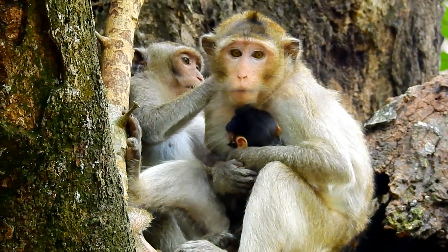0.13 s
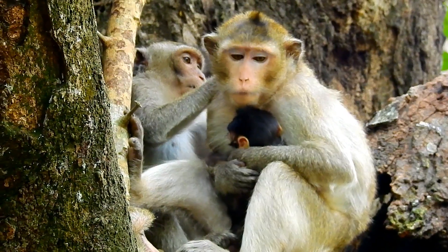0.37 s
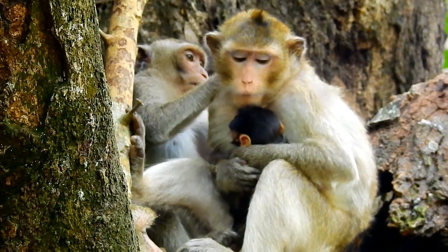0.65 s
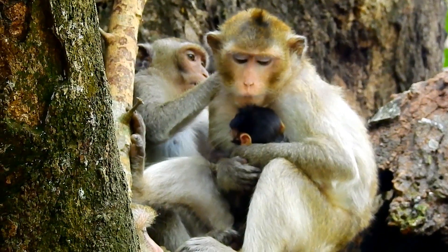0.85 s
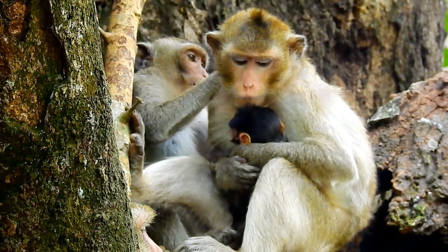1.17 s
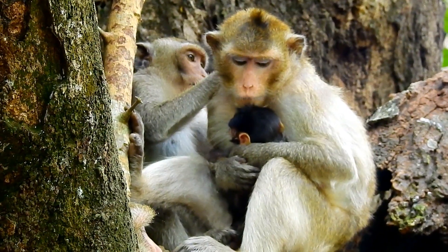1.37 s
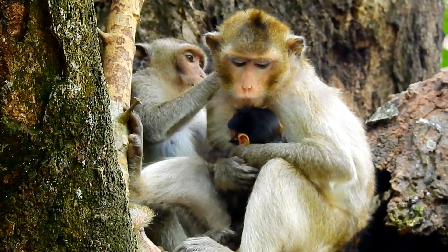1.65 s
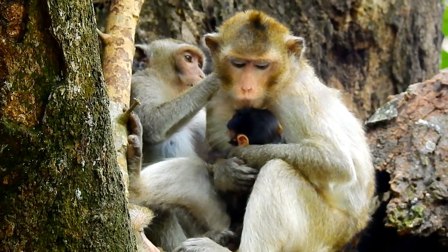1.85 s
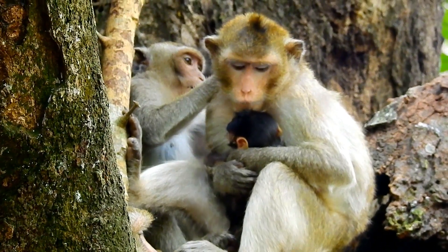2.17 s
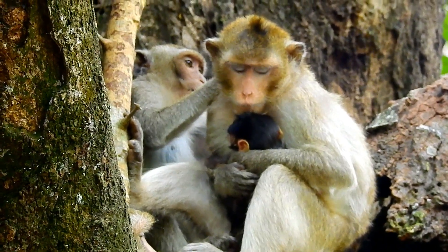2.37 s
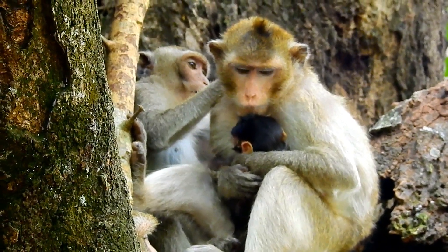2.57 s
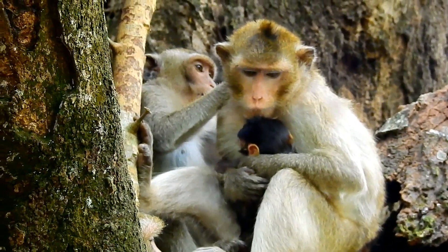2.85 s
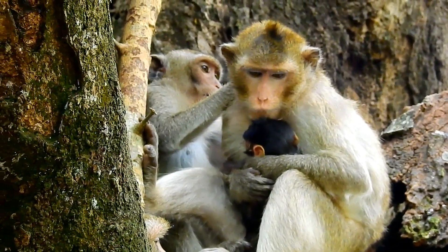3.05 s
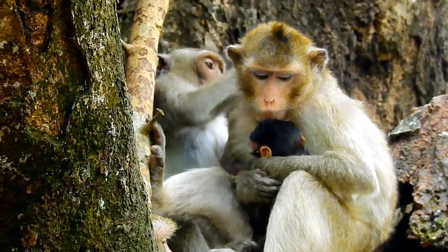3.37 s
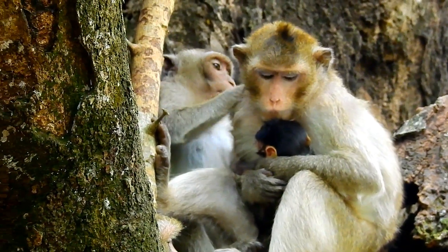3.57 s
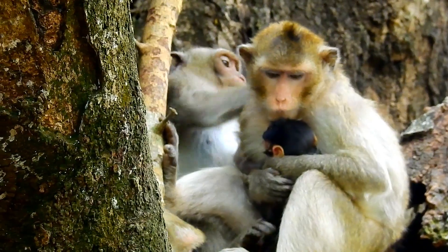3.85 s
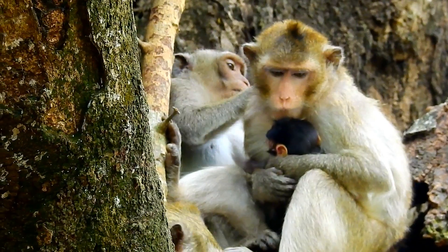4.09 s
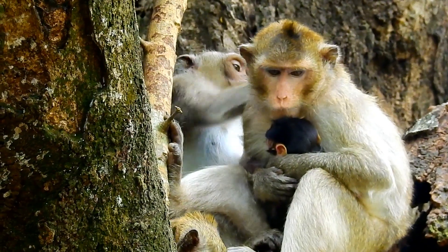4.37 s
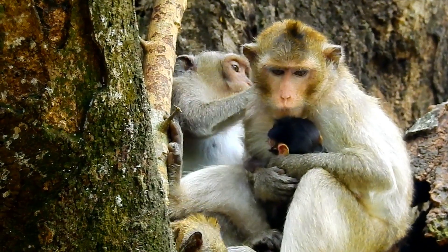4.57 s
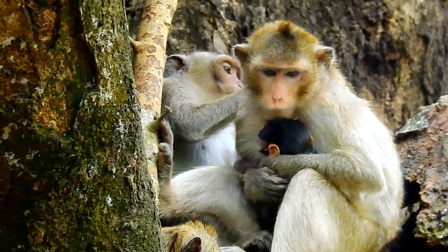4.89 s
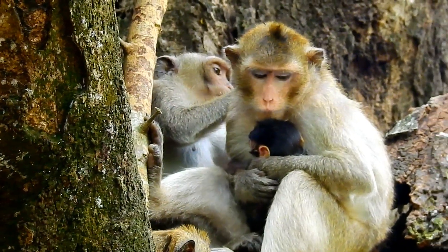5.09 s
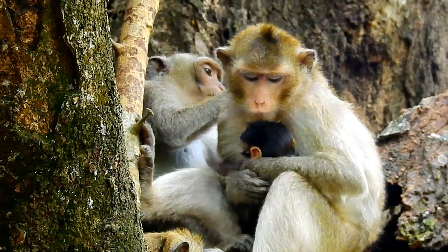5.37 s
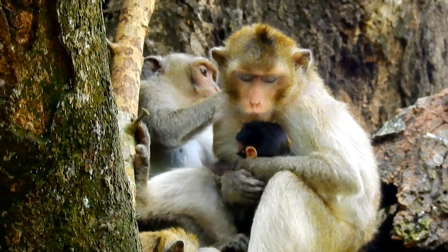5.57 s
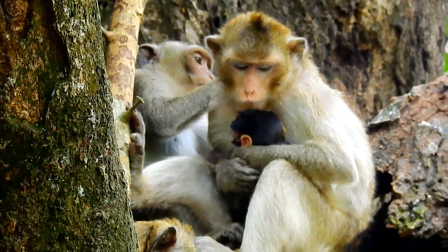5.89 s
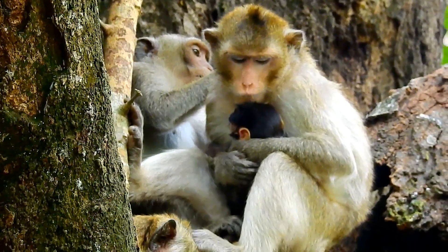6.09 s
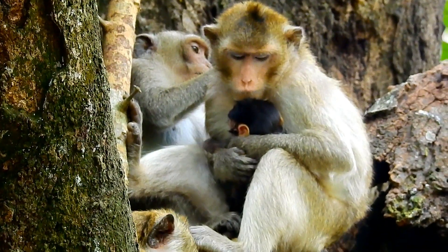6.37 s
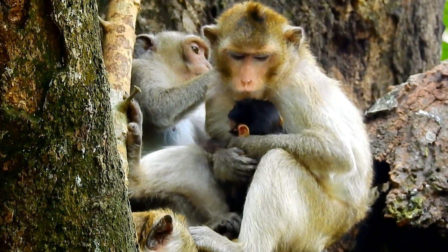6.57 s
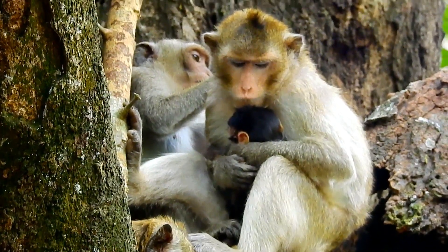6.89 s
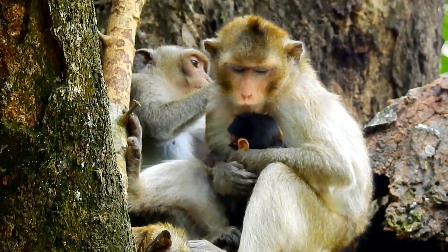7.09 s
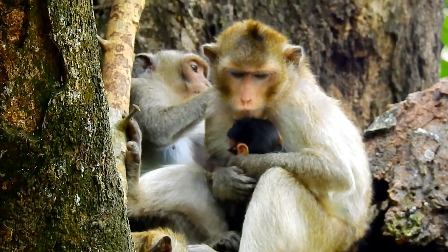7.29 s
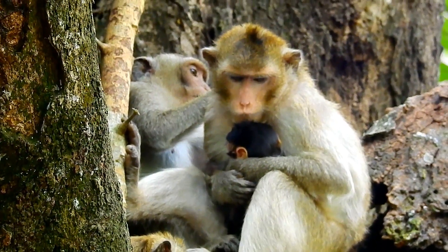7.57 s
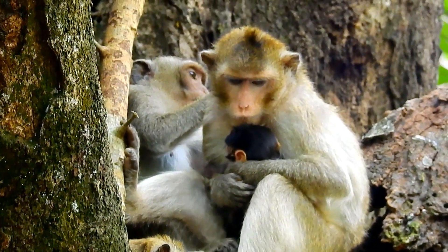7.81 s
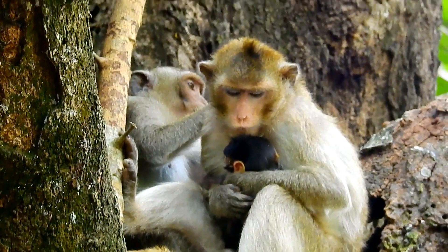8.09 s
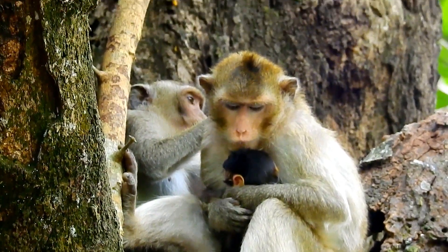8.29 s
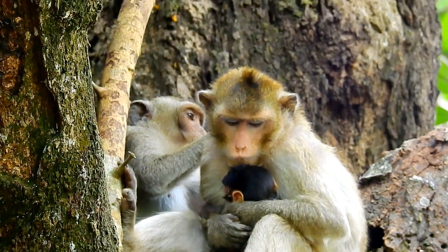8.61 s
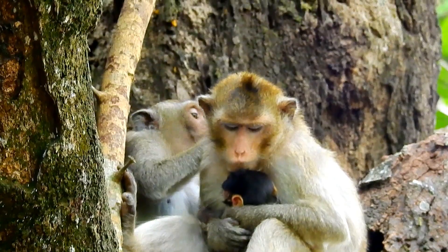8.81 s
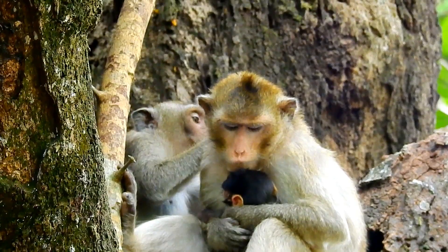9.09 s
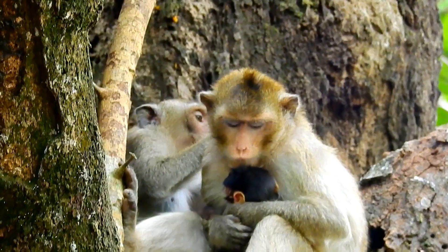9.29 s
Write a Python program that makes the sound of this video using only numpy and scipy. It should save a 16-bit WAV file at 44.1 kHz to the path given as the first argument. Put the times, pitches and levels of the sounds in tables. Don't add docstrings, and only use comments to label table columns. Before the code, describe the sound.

Outdoor forest with a constant high cicada hiss and soft distant traffic rumble. A faint falling whistle-like animal call comes early, then two tiny dull taps. Midway, a monkey close to the microphone scrambles for about a second, thrashing dry leaves and thudding on branches. Smaller rustles follow, then scattered woody ticks, and the insects remain.

```python
import sys
import numpy as np
from scipy import signal
from scipy.fft import rfft, irfft, next_fast_len
from scipy.io import wavfile
from scipy.ndimage import uniform_filter1d, map_coordinates

SR = 44100
rng = np.random.default_rng(int(sys.argv[2]) if len(sys.argv) > 2 else 0)


def volts_from_db(level):
    exponent = np.asarray(level, float) / 20
    return 10 ** exponent


def materialize(psi):
    bounded = np.clip(np.atleast_2d(psi).T, -1, 1)
    quanta = np.round(bounded * 32767).astype(np.int16)
    wavfile.write(sys.argv[1], SR, quanta)


N = 416744


def unit(x):
    return x / np.sqrt(np.mean(x ** 2) + 1e-20)


def along(points, hz):
    f, v = np.transpose(points)
    return np.interp(np.log(hz + 1), np.log(f + 1), v)


def curves(rows):
    s, *columns = np.transpose(rows)
    return [np.interp(np.arange(N) / SR, s, column) for column in columns]


def wobble(rate):
    knots = rng.standard_normal(int(N * rate / SR) + 4)
    return map_coordinates(knots, [np.arange(N) * rate / SR])


def filtered(x, response):
    m = next_fast_len(N + SR // 2)
    return irfft(rfft(x, m) * response(np.fft.rfftfreq(m, 1 / SR)), m)[..., :N]


def modes(table):
    def resonance(f, centre, width, db):
        return volts_from_db(db) * 1j * f * width / (centre * centre - f * f + 1j * f * width)

    return lambda f: sum((-1) ** k * resonance(f, *row) for k, row in enumerate(table))


def shaped(x, table):
    return unit(filtered(x, lambda hz: volts_from_db(along(table, hz))))


def patchy(depth_db):
    z = signal.stft(rng.standard_normal((2, N)), nperseg=256)[2]
    field = rng.standard_normal(z.shape[1:])
    field = uniform_filter1d(uniform_filter1d(field, 8, 0), 8, 1)
    return unit(signal.istft(z * volts_from_db(depth_db * unit(field)), nperseg=256)[1][:, :N])


def bursts(events, rise):
    t, env = np.arange(SR // 2) / SR, np.zeros(N + SR)
    for s, db, t60 in events:
        env[round(s * SR):][:len(t)] += volts_from_db(db - 60 * t / t60) * (1 - np.exp(-t / rise))
    return env[:N]


# frequency in Hz, left-right likeness 0-1.
NEAR_WIDTH = [(60, 1), (600, 0.9402), (2000, 0.9133), (4100, 0.8551), (6900, 0.7305), (10000, 0.1335),
              (15000, 0.317)]
FAR_WIDTH = [(60, 1), (200, 0.9474), (600, 0.7823), (2000, 0.9813), (4100, 0.4766), (6900, 0.4516),
             (10000, 0.3467), (15000, 0.22)]
# frequency in Hz, lead of the left port in radians.
PORT_LEAD = [(100, 0), (300, -0.2418), (3400, 0.2585), (5500, 0.7711), (6900, 1.5), (8300, 2), (12000, 3.5)]


def spread(pair, alike):
    def mid_side(hz):
        angle = np.arccos(np.clip(along(alike, hz), -1, 1)) / 2
        return np.array([np.cos(angle), np.sin(angle)])

    mid, side = filtered(pair, mid_side)
    return filtered(np.array([mid + side, mid - side]),
                    lambda hz: np.exp(.5j * along(PORT_LEAD, hz) * [[1], [-1]]))


# time in seconds, turn 0-1, low swell in dB.
CHORUS_TURNS = [(0.0, 0.17, -1), (0.8, 0.3, 0), (1.4, 0.25, 0), (3.2, 0.12, -1), (4.4, 0.84, 1),
                (5.4, 0.27, 3), (5.9, .3, 0), (6.4, .8, -.5), (6.9, .95, -.5), (7.2, .6, 1.5),
                (7.6, .3, -1), (9.45, 0.14, -1)]
# band in Hz, width in Hz, level in dB (all but the first ride on their crowd's level).
TYMBALS = [(5135.1, 793.6, -38.5), (6136.2, 690.7, 3), (6757, 620.5, 1.5), (7193.7, 864, 5),
           (8304, 606.8, -7.5)]
LOW_DB, MIDDLE_DB, HIGH_DB = -37, -44, -34
TURN_SWELL_DB, TURN_HUSH_DB = 14, 4.5
PULSE_HZ = (109.02, 238.95, 196.64, 92.96, 298.6)


def cicadas():
    turn, low_swell_db = curves(CHORUS_TURNS)
    low_db = LOW_DB + low_swell_db
    middle_db = MIDDLE_DB + TURN_SWELL_DB * turn
    high_db = HIGH_DB - TURN_HUSH_DB * turn
    crowds_db = [0, low_db, middle_db, high_db, high_db]
    out = 0
    for (hz, width, db), crowd_db, rate in zip(TYMBALS, crowds_db, PULSE_HZ):
        drifting_hz = rate * (1 + 0.087 * wobble(3.4))
        beat = 1 + 0.0835 * np.cos(2 * np.pi * np.cumsum(drifting_hz) / SR)
        band = lambda f: modes([(hz, width, 0)])(f) ** 2 / (1 + (f / 10000) ** 8)
        level = volts_from_db(db + crowd_db + 0.829 * wobble(1) + 0.473 * wobble(9))
        out = out + level * unit(filtered(beat * patchy(depth_db=0.5), band))
    return spread(out, FAR_WIDTH)


# frequency in Hz, level in dB per Hz.
TRAFFIC_COLOUR = [(13, -41.5), (22, -20.5), (32, -12.5), (54, -4.5), (75, 1.5), (167, -6.5), (193, -12.5),
                  (320, -33), (420, -34.5), (700, -120)]
# frequency in Hz, level in dB per Hz.
AIR_COLOUR = [(120, -12.5), (200, -1), (260, -5), (400, -2.5), (700, -1.5), (2260, -8), (3500, 1),
              (4300, -4.5), (9000, -4.5), (10300, -16), (11200, -9.5), (12200, -32.5), (13500, -38),
              (14600, -17), (15300, -32)]
TRAFFIC_DB, AIR_DB = -40.5, -47


def distance():
    rumble = shaped(patchy(depth_db=.5), TRAFFIC_COLOUR)
    wash = shaped(patchy(depth_db=2.5), AIR_COLOUR)
    heave = volts_from_db(TRAFFIC_DB + 1.141 * wobble(2.5356))
    return spread(heave * rumble + volts_from_db(AIR_DB) * wash, FAR_WIDTH)


# time in seconds, level in dB.
WHINE_LEVEL = [
    (0, -75.5),
    (2.0, -65.5),
    (2.2, -60.5),
    (3.3, -61),
    (4, -78.5),
    (7.2, -62.5),
    (9.45, -62),
]


def whine():
    line = unit(filtered(rng.standard_normal((2, N)), lambda f: modes([(1770, 150, 0)])(f) ** 2))
    return volts_from_db(curves(WHINE_LEVEL)[0]) * spread(line, FAR_WIDTH)


# time in seconds, swish in dB.
RESTLESSNESS = [(0.0, -40), (0.29, -50), (0.53, -43), (1.45, -48.5), (1.74, -56.5), (2.8, -57.5),
                (3.36, -51), (3.48, -36.5), (4.45, -38.5), (4.72, -41.5), (5.2, -47.5), (5.64, -53.5),
                (5.75, -45), (6.9, -46), (7.27, -54), (7.8, -56), (8.0, -50), (9.45, -60.5)]
# peak time in seconds, swish in dB,
# swell in seconds, settle in seconds (each to 20 dB under the peak).
MOVES = [(3.49, -31.5, 0.157, 0.1415), (3.66, -31, .2, 0.2275), (3.712, -29, 0.1869, 0.2067),
         (3.94, -30, 0.2153, 0.2096), (4.072, -29, 0.01903, 0.2466), (4.21, -31, 0.2317, 0.2689),
         (4.314, -31, 0.02373, 0.2766), (4.38, -36, 0.1401, 0.1543), (4.458, -30, 0.04363, 0.1086),
         (4.51, -33.5, 0.0478, 0.3486), (4.78, -46, .04, .2), (5.285, -43.5, 0.042, 0.0693),
         (5.53, -45.5, 0.1449, 0.4426), (5.72, -42.5, 0.0665, 0.3967), (5.97, -43.5, 0.1754, 0.7676),
         (6.42, -45, 0.1155, 0.0959), (6.6, -40.5, 0.0533, 0.3073), (6.67, -45.5, 0.1046, 0.1832),
         (6.85, -44.5, 0.126, 0.0044)]
FULL_DB = -30


def effort_db():
    t = np.arange(N) / SR
    power = volts_from_db(curves(RESTLESSNESS)[0]) ** 2
    for s, db, swell, settle in MOVES:
        power = power + volts_from_db(db - 20 * np.maximum((s - t) / swell, (t - s) / settle)) ** 2
    return 10 * np.log10(power)


# start in seconds, peak in dB, t60 in seconds.
TWIG_WHIPS = [
    (3.4894, -5.5, 0.1943),
    (3.7184, -8, 0.1226),
    (3.89, -10, 0.206),
    (3.945, -1, 0.2),
    (4.089, -4, 0.08),
    (4.324, 6.5, 0.1128),
    (4.3614, -1.5, 0.1171),
    (4.4674, 4.5, 0.16604),
    (5.2789, -11, 0.408),
]
# frequency in Hz, level in dB per Hz.
LEAF_COLOUR = [(410, -47), (700, -17), (728, -20.5), (931, -24), (1150, -22.5), (2250, -14.5), (2460, -15),
               (3680, -10.5), (4530, -4.5), (5510, -2.5), (6690, 2), (7420, -2.5), (10100, -27),
               (15600, -58)]
CRISP_DB, SHEEN_DB, SHEEN_FOLLOWS = 9, -21, .6
TIPS_LAG_S, WHIP_SHEEN_DB = .012, -24


def leaves():
    swish_db = effort_db()
    bright_db = SHEEN_DB + (SHEEN_FOLLOWS - 1) * (swish_db - FULL_DB)
    ticks = (rng.random((2, N)) < 1500 / SR) * rng.standard_normal((2, N))
    raw = patchy(depth_db=2.5) + 0.6178 * unit(ticks)

    def above(hz, edge_hz):
        return 1 / np.sqrt(1 + (edge_hz / (hz + 1)) ** 12)

    def part(cut):
        return unit(filtered(raw, lambda hz: volts_from_db(along(LEAF_COLOUR, hz)) * cut(hz)))

    swish = part(lambda hz: 1 - above(hz, 4486.1))
    crisp = part(lambda hz: above(hz, 4654))
    sheen = part(lambda hz: above(hz, 9856.7) ** 2)
    whip = bursts(TWIG_WHIPS, rise=0.00606) * volts_from_db(-15.5 + wobble(79))
    effort = volts_from_db(swish_db + 0.9 * wobble(30))
    tips = np.interp(np.arange(N) - TIPS_LAG_S * SR, np.arange(N), effort)
    top = tips * volts_from_db(bright_db) + whip * volts_from_db(WHIP_SHEEN_DB)
    return spread(effort * swish + top * sheen + (tips * volts_from_db(CRISP_DB) + whip) * crisp, NEAR_WIDTH)


# time in seconds, pitch in Hz, level in dB.
CALL_GLIDE = [
    (1.262, 1215, -60),
    (1.284, 1115, -43.5),
    (1.315, 1165, -46.5),
    (1.342, 1143, -50.5),
    (1.362, 1129, -41.5),
    (1.535, 1035, -38.5),
    (1.556, 973.7, -57),
    (1.568, 915, -48),
    (1.64, 590, -58),
]


def call():
    hz, db = curves(CALL_GLIDE)
    t = np.arange(N) / SR
    gate = np.clip(np.minimum(t - CALL_GLIDE[0][0], CALL_GLIDE[-1][0] - t) / 0.01068, 0, 1)
    phase = 2 * np.pi * np.cumsum(hz * (1 + 0.00344 * wobble(45.332))) / SR
    whistle = np.sin(phase) + volts_from_db(-24.5) * np.sin(2 * phase)
    return np.sqrt(2) * gate * volts_from_db(db + 0.751 * wobble(40.404)) * whistle


# frequency in Hz, t60 in seconds.
WOODS_DECAY = [(300, 0.1939), (3000, 0.2676), (10000, 0.0698)]


def trees(x):
    hz, t, z = signal.stft(rng.standard_normal((2, SR // 2)), SR, nperseg=256)
    decay = volts_from_db(-60 * t / along(WOODS_DECAY, hz)[:, None])
    tail = signal.istft(z * decay, SR, nperseg=256)[1]
    return signal.fftconvolve(x[None], tail / np.linalg.norm(tail[0]), axes=1)[:, :N]


# start in seconds, peak in dB, t60 in seconds.
DRIPS = [
    (2.188, -33, 0.0461),
    (2.208, -35.5, 0.042),
]


def drip():
    hollow = modes([(560, 81.7, 4), (890.6, 230, -3.5), (1750, 272, -5)])
    return bursts(DRIPS, rise=0.002633) * unit(filtered(rng.standard_normal(N), hollow))


# start in seconds, peak in dB, thud in dB, thud in Hz, t60 in seconds.
LANDINGS = [(3.419, -22, -13, 144.8, 0.05205), (3.463, -22, -9.5, 170.5, 0.0547),
            (3.493, -28.5, -3, 611.4, 0.06836), (3.6068, -22.5, -12.5, 195.7, 0.05324),
            (3.651, -25, -5, 220, 0.074), (3.7076, -20, -2, 155.8, 0.0543), (3.906, -30.5, -8, 178, 0.0512),
            (4.068, -13.5, -23, 466.6, 0.0479), (4.2001, -24.5, -6.5, 316.1, 0.05374),
            (4.2252, -20.5, -15.5, 479.2, 0.05994), (4.29, -30.5, -2.5, 399.9, 0.06963),
            (4.313, -10, -15, 228.3, 0.04925), (4.453, -17.5, -16, 159, 0.0758),
            (4.502, -23.5, -13.5, 265.3, 0.06235)]
# frequency in Hz, width in Hz, level in dB.
BRANCH_MODES = [(159.49, 75.46, 2), (338.63, 137.48, -3), (468.25, 104.88, -4), (620, 38.78, -2.5),
                (1089.3, 910, -17)]
RUB_DB, RUB_FOLLOWS = -39.5, 0.76367


def branch():
    rub_db = RUB_DB + RUB_FOLLOWS * (effort_db() - FULL_DB)
    shocks = [(s, db + thud + 1, t60) for s, db, thud, _, t60 in LANDINGS]
    drive = volts_from_db(rub_db + 0.5 + 2.909 * wobble(25)) + bursts(shocks, rise=0.001785)
    noise = rng.standard_normal(N)
    body = modes(BRANCH_MODES)
    wood = filtered(drive * noise, body) / np.std(filtered(noise, body))

    t = np.arange(SR // 4) / SR
    attack = 1 - np.exp(-t / 0.004514)
    for s, db, thud, hz, t60 in LANDINGS:
        decay = volts_from_db(db + thud + 6.0 - 60 * t / (1.218 * t60))
        wood[round(s * SR):][:len(t)] += decay * attack * np.sin(2 * np.pi * hz * t)

    bark = unit(filtered(rng.standard_normal(N), modes([(1858, 671.6, -3), (2967, 777, 0.8663)])))
    scuffs = [(s, db - 4, 0.5808 * t60) for s, db, _, _, t60 in LANDINGS]
    return wood + bark * bursts(scuffs, rise=0.001184)


# start in seconds, peak in dB, lowest mode in Hz,
# hardness in dB per mode, t60 in seconds.
DEBRIS = [
    (6.137, -30, 400, -3, 0.03),
    (6.265, -41, 1750, -11, 0.0802),
    (6.332, -34, 1491, -3.5, 0.0255),
    (6.572, -33, 1869, -7, 0.026),
    (6.612, -35.5, 1800, -2, 0.0362),
    (6.655, -35.5, 1959, -15, 0.0545),
    (6.727, -30.5, 560, -3, 0.02438),
    (6.776, -33, 484.3, -4.5, 0.08053),
    (7.908, -43, 1651, -8.5, 0.0456),
    (8.677, -32.5, 933.9, 0, 0.01345),
]


def taps():
    out, t = np.zeros(N + SR), np.arange(SR // 8) / SR
    attack = 1 - np.exp(-t / 0.0006886)
    for s, db, hz, hard_db, t60 in DEBRIS:
        ring = 0
        for k, ratio in enumerate([1, 1.55, 2.1, 2.9]):
            ring = ring + volts_from_db(k * hard_db) * np.sin(2 * np.pi * ratio * hz * t)
        out[round(s * SR):][:len(t)] += volts_from_db(db - 60 * t / t60) * attack * ring
    return out[:N]


def scene():
    wood, voice = branch() + drip() + taps(), call()
    near = (leaves() + wood) * volts_from_db([[.4], [-.4]])  # left, right in dB
    echo = volts_from_db(-17.0) * trees(wood + volts_from_db(-13.5) * voice)
    return near + voice + echo + cicadas() + whine() + distance()


def top_cut(x):
    return signal.sosfilt(signal.butter(12, 15650, fs=SR, output="sos"), x)


def record(dry):
    rounded = dry / (1 + np.abs(dry / .8) ** 4) ** (1 / 4)
    return top_cut(rounded)


dry = scene()
out = record(dry)
materialize(out)
```